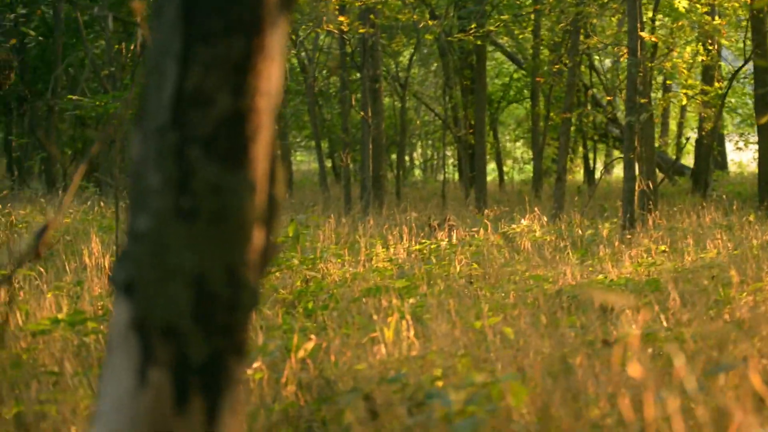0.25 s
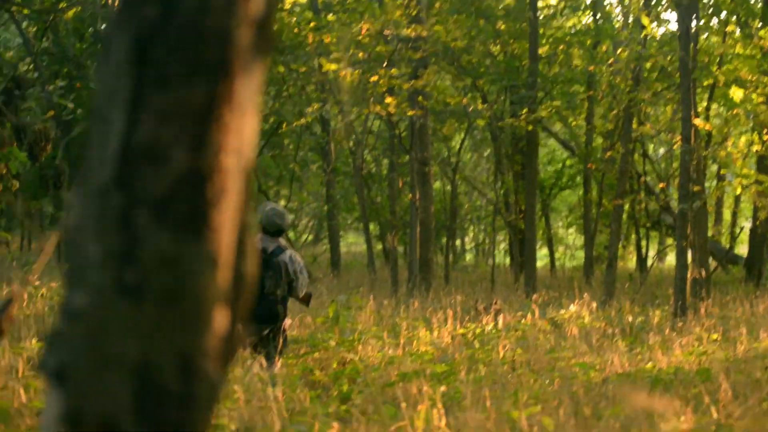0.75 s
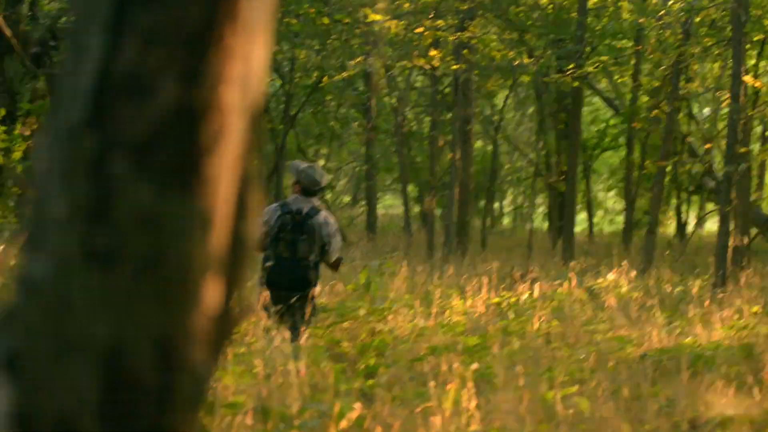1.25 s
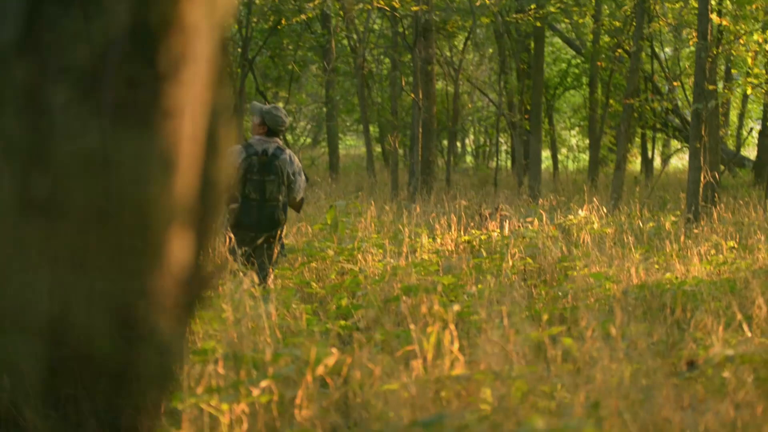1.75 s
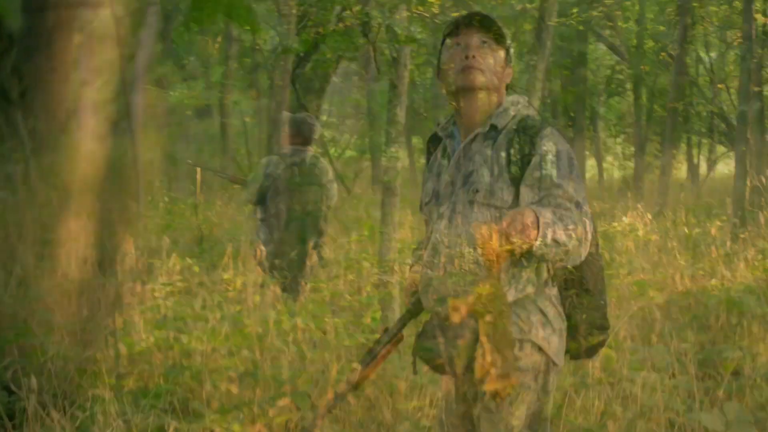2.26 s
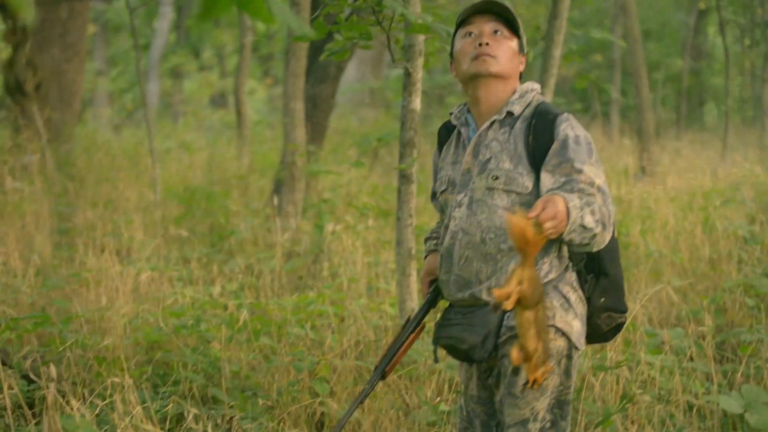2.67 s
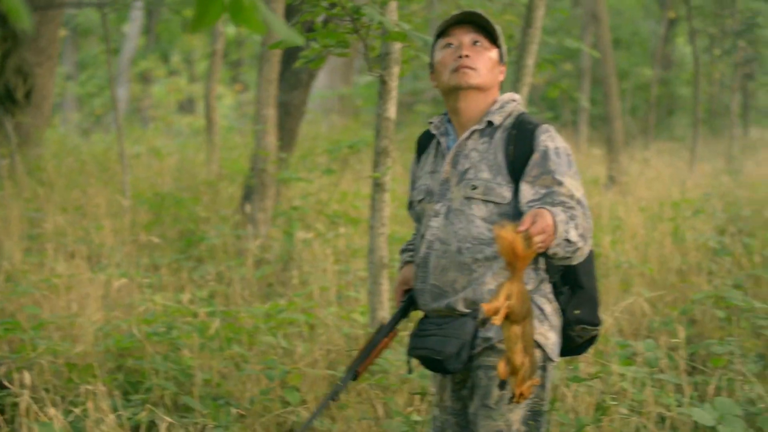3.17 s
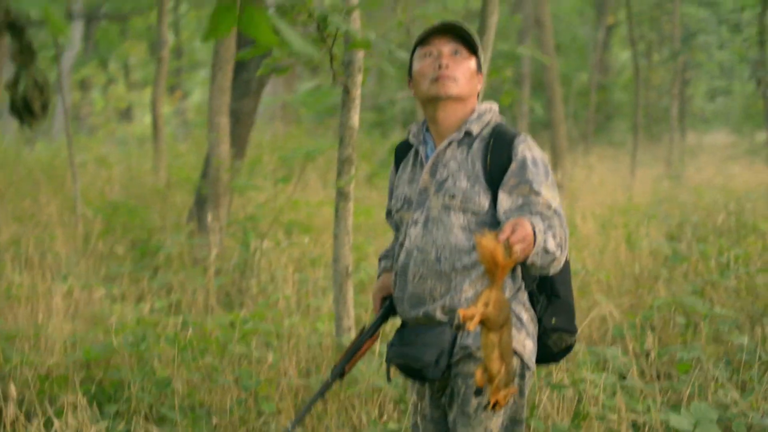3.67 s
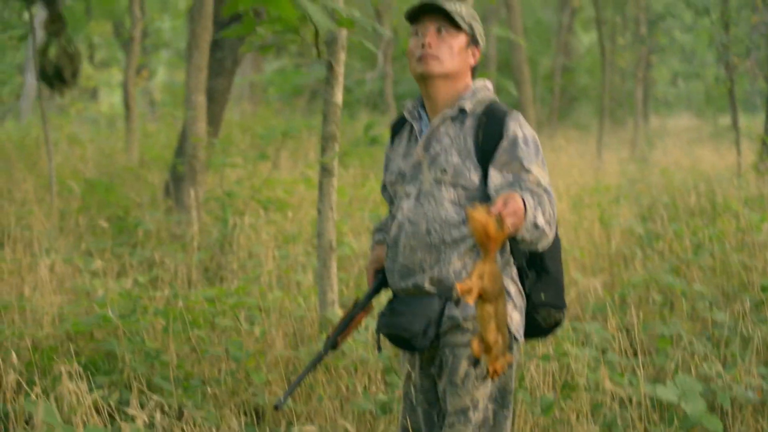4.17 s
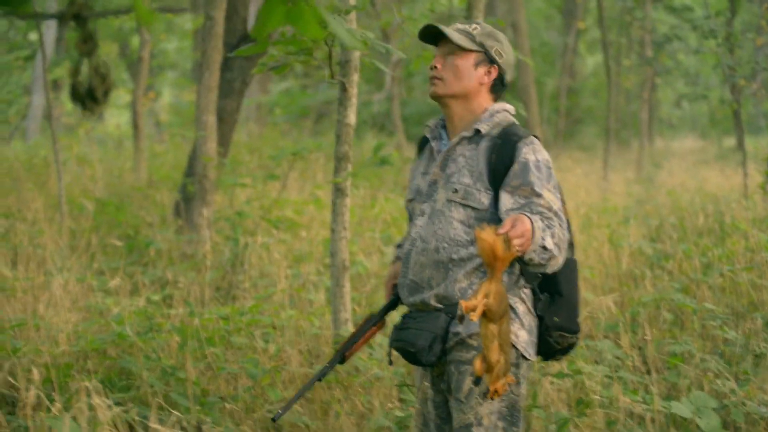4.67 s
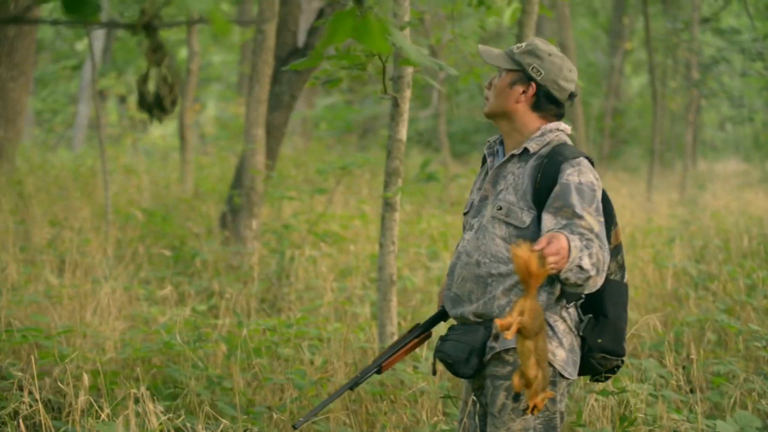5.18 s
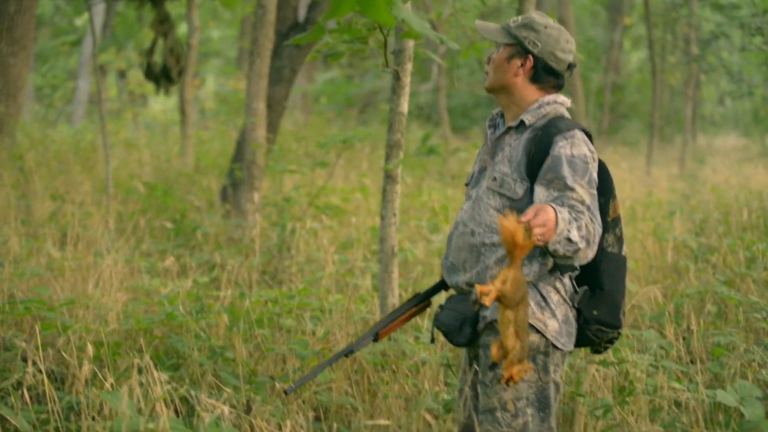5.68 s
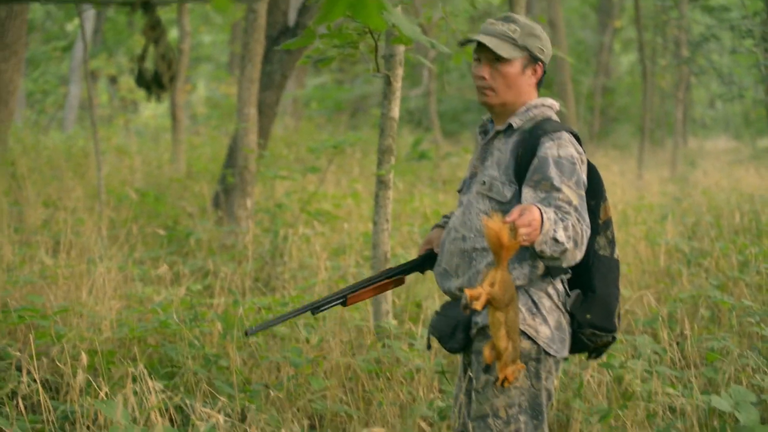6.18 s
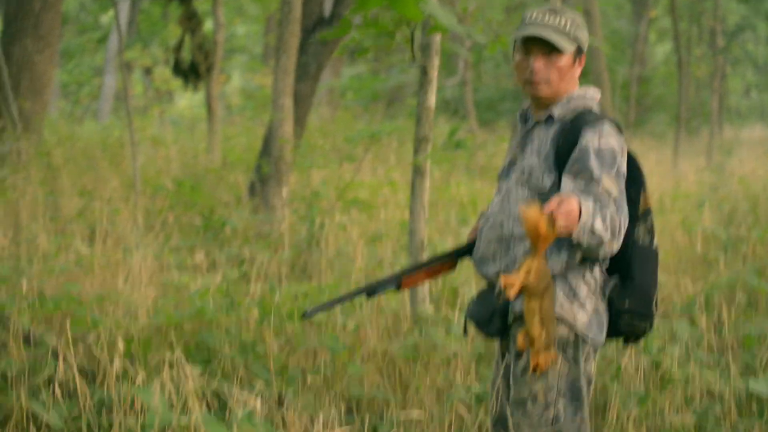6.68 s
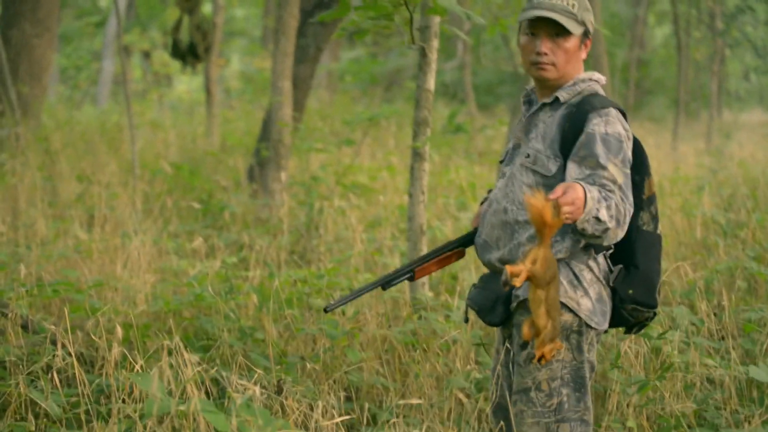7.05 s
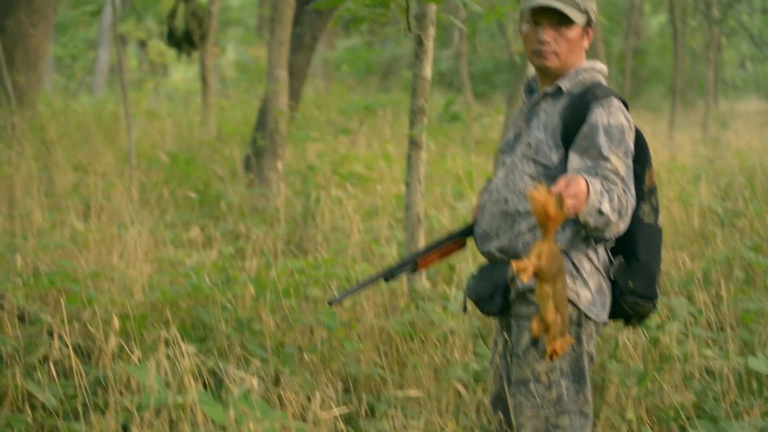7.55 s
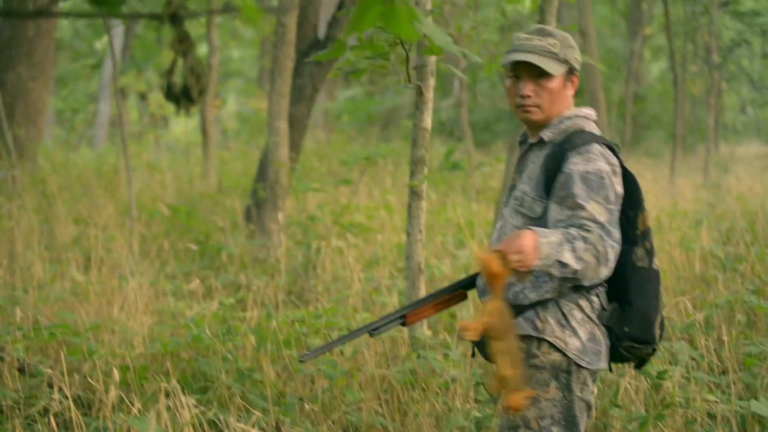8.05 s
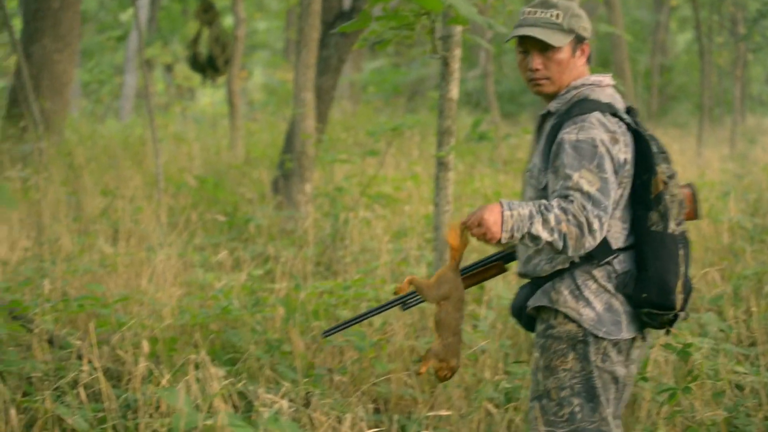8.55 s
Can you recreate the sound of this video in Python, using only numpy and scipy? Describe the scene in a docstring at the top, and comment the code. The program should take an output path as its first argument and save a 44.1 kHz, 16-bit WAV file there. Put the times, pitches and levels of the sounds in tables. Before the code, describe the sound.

Insects dominate a summer glade: steady high hiss, a rasping near cicada whose pitch slides down with each swell, and a fainter tonal one far off. First come close grass crunches and a hard woody snap; after an abrupt change of place and quick fade-in, movement thins to light ticks and soft cloth swishes. Late, a small bird whistles twice and chirps softly. Mono, open-air microphone.

```python
"""Cicadas in summer woodland

Heard from two spots in turn, the wood's edge and a glade, in mono. At each a near cicada buzzes and, about
every 0.8 s, squeezes out an accent: its clicks speed up while its abdomen's resonance slides down. Behind it:
a chorus and air of filtered noise, a far cicada and, in the glade, trills and a bird of gliding sines.
Ringing noise bursts and brushed noise are someone walking through dry grass; decaying modes are a twig's snap."""
import sys
import numpy as np
from scipy import signal
from scipy.fft import rfft, irfft, next_fast_len
from scipy.io import wavfile

SR = 44100
rng = np.random.default_rng(int(sys.argv[2]) if len(sys.argv) > 2 else 0)


def master_out(mix):
    """Clip the mix to full scale and print it as 16-bit PCM to the path in sys.argv[1]."""
    frames = np.transpose(np.atleast_2d(mix))
    ceiling = np.clip(frames, -1, 1)
    pcm = np.round(ceiling * 32767).astype(np.int16)
    wavfile.write(sys.argv[1], SR, pcm)


N = 388521
T = np.arange(N) / SR


def undb(db):
    """Decibels to gain."""
    return 10 ** (np.asarray(db) / 20)


def unit(x):
    """Scale to rms 1."""
    return x / np.sqrt(np.mean(x ** 2))


def curve(rows):
    """Join (t/s, value) rows by straight lines."""
    return np.interp(T, *np.transpose(rows))


def add(out, start_s, x):
    """Mix x into out from start_s on."""
    i = int(np.clip(start_s * SR, 0, N - 1))
    out[i:i + len(x)] += x[:N - i]


def colour(x, response):
    """Filter by (f/Hz, level/dB) points; beyond the ends the response falls 20 dB per octave."""
    size = next_fast_len(N + 4096)
    octave = np.log2(np.arange(size // 2 + 1) * SR / size + 1)
    hz, db = np.transpose(response)
    beyond = np.abs(octave - np.clip(octave, np.log2(hz[0]), np.log2(hz[-1])))
    gain = undb(np.interp(octave, np.log2(hz), db) - 20 * beyond)
    return irfft(rfft(x, size) * gain, size)[:N]


def walk(points_per_s):
    """Random points joined by lines, with a spread near 1."""
    return 1.2 * np.interp(T * points_per_s, np.arange(4096), rng.standard_normal(4096))


def woods(x, wet_db, t60_s, sway_hz=0.3535):
    """Direct sound plus the scatter from trunks and leaves, whose pattern shifts as they sway."""
    t = np.arange(SR // 2) / SR
    envelope = undb(-60 * t / t60_s) * np.clip(t / 0.0035, 0, 1)
    tails = rng.standard_normal((2, len(t))) * envelope
    one, other = (signal.oaconvolve(x, tail / np.linalg.norm(tail))[:N] for tail in tails)
    turn = 2 * np.pi * sway_hz * T
    wet = undb(wet_db)
    scatter = np.cos(turn) * one + np.sin(turn) * other
    return (x + wet * scatter) / np.hypot(1, wet)


# open-air spectrum, relative: f/Hz, level/dB (per Hz)
AIR_SPECTRUM = [(20, -12), (76, -5.5), (105, -4), (138, -1), (200, -6), (400, -11), (630, -14),
                (900, -12.5), (1200, -16.5), (1800, -21)]


def air(level_db):
    """A faint low murmur of the open air: filtered noise with a drifting level."""
    drift_db = 1.2 * walk(5)
    return unit(colour(rng.standard_normal(N), AIR_SPECTRUM)) * undb(level_db + drift_db)


# chorus spectrum at each spot, relative: f/Hz, level/dB (per Hz)
EDGE_CHORUS_SPECTRUM = [(1800, -34), (2600, -28), (3300, -10), (4200, -9.5), (5300, 1.5), (6100, -6.5),
                        (6900, -15), (7700, -18), (8900, -36), (12500, -36.5), (15500, -33)]
GLADE_CHORUS_SPECTRUM = [(1800, -39), (2600, -26), (3300, -10), (3700, -6.5), (4200, -6.5), (5300, 2.5),
                         (5750, -2.5), (6700, -9.5), (7800, -16), (8900, -29.5), (10500, -36), (13000, -41),
                         (15500, -36.5)]


def chorus(spectrum, level_db, count=5):
    """Many cicadas blurred by the trees into a hiss, which throbs at several wandering click rates."""
    throb = np.zeros(N)
    for _ in range(count):
        rate_hz = rng.uniform(230, 400) * (1 + .03 * walk(3))
        throb += np.cos(2 * np.pi * np.cumsum(rate_hz) / SR)
    hiss = rng.standard_normal(N) * (1 + 0.07 * throb)
    return unit(colour(hiss, spectrum)) * undb(level_db + 0.79 * walk(5.5))


# thin trills: f/Hz, flutter rate/(points per s), level/dB
TRILL_TONES = [(5830, 82, -38), (6380, 30, -58), (6690, 33, -61), (6770, 15, -51.5)]


def trills():
    """Distant insects that each hold one pitch, fluttering in strength and phase."""
    out = np.zeros(N)
    for hz, flutter, db in TRILL_TONES:
        wobble = walk(flutter) + 1j * walk(flutter)
        out += undb(db) * unit(np.real(wobble * np.exp(2j * np.pi * hz * T)))
    return out


def tymbals(rate_hz, ring_hz, rise_s, lag, scatter_db, jitter):
    """Two ribbed plates buckle in turn, each click ringing the hollow abdomen; returns ring and octave."""
    phase = np.cumsum(rate_hz * (1 + jitter * walk(300))) / SR
    phase = phase + lag * np.cos(np.pi * phase)  # second plate slightly out of step: half-rate lines
    age_s = (phase % 1) / rate_hz
    size = undb(scatter_db * rng.standard_normal(8192))[phase.astype(int) % 8192]
    turn = 2 * np.pi * ring_hz * age_s
    envelope = size * age_s / rise_s * np.exp(-age_s / rise_s)
    return unit(envelope * np.sin(turn)), unit(envelope * np.sin(2 * turn))


# far cicada's accents: t/s, level/dB
FAR_ACCENT_LEVELS = [(1.9, -38), (3.62, -36.5), (4.498, -36.5), (5.392, -34), (6.28, -32), (7.181, -32.5),
                     (8.07, -35), (8.4, -32)]
# click rate at the first accent, and its slow rise
FAR_CLICK_HZ, FAR_RISE_HZ_PER_S = 365.7, 1.3


def far_cicada(width_s=0.098):
    """Only the low, tonal end of each accent carries this far; the click rate sags through each."""
    s, db = np.transpose(FAR_ACCENT_LEVELS)
    since_s = T - s[:, None]
    loudness = undb(db) @ np.exp(-(since_s / width_s) ** 2)
    nearest_s = s[np.argmin(np.abs(since_s), axis=0)]
    sag = 1 - 0.055 * np.clip(T - nearest_s, -.2, .2)
    rate_hz = (FAR_CLICK_HZ + FAR_RISE_HZ_PER_S * (T - s[0])) * sag
    ring, _ = tymbals(rate_hz, 3400, 0.00031, lag=0.0059, scatter_db=2.0, jitter=0.00343)
    response = [(2000, -24), (2600, -9), (2950, 1), (3350, 0.5), (3700, 7.5), (4400, -9), (6000, -12)]
    return woods(unit(colour(ring, response)) * loudness, wet_db=-7.5, t60_s=0.25)


def note(length_s, from_hz, to_hz, arch_hz=0):
    """One pure gliding note that swells and fades, its pitch arching over the middle."""
    u = np.linspace(0, 1, int(length_s * SR))
    swell = np.sin(np.pi * u)
    pitch_hz = from_hz + (to_hz - from_hz) * u + arch_hz * swell
    return swell * np.sin(2 * np.pi * np.cumsum(pitch_hz) / SR)


# falling whistles: t/s, level/dB (peak, before scatter)
WHISTLE_STARTS = [(5.55, -60), (6.33, -54)]
WHISTLE_S, WHISTLE_FROM_HZ, WHISTLE_TO_HZ = .16, 2050, 1550
# even row of rising chirps, each fainter than the last
CHIRP_FIRST_S, CHIRP_EVERY_S, CHIRP_S = 6.858, .2245, 0.051
CHIRP_FROM_HZ, CHIRP_TO_HZ, CHIRP_ARCH_HZ = 1680, 1907, 90
CHIRP_DB, CHIRP_STEP_DB = -50.5, -0.36


def bird(count=7):
    """A small bird: two falling whistles, then a row of short rising chirps, all gliding sines."""
    out = np.zeros(N)
    for s, db in WHISTLE_STARTS:
        add(out, s, undb(db) * note(WHISTLE_S, WHISTLE_FROM_HZ, WHISTLE_TO_HZ))
    for k in range(count):
        chirp = note(CHIRP_S, CHIRP_FROM_HZ, CHIRP_TO_HZ, CHIRP_ARCH_HZ)
        add(out, CHIRP_FIRST_S + k * CHIRP_EVERY_S, undb(CHIRP_DB + k * CHIRP_STEP_DB) * chirp)
    return woods(out, wet_db=1.0, t60_s=0.37)


# clothing swishes: middle t/s, length/s, level/dB
CLOTH_SWISHES = [(1.35, 0.53, -59), (2.245, 0.47, -64.5), (3.9, 0.62, -63.5), (5.88, 0.66, -68),
                 (8.55, 0.6, -67.5)]


def clothing(rest_db=-75):
    """Cloth slides on cloth as the walker shifts: noise swells, over a faint floor from the second on."""
    s, length_s, db = np.transpose(CLOTH_SWISHES)
    swells = undb(db) @ np.exp(-(2 * (T - s[:, None]) / length_s[:, None]) ** 4)
    sliding = swells + undb(rest_db) * (T > s[1])
    response = [(150, -7), (280, -0.5), (450, 0.5), (650, -10.5), (1200, -10.0)]
    return unit(colour(rng.standard_normal(N), response)) * sliding


# twig's modes, relative: f/Hz, level/dB, t60/s
TWIG_MODES = [(227, -22, 0.027), (814, -8.5, 0.011), (1590, -9, 0.016), (1970, 10, 0.0035),
              (2360, 0, 0.004)]
SNAP_S, SNAP_DB = .5462, -5.5  # dB: knock peak before bass cut and scatter


def snap():
    """A twig breaks close by: decaying modes make a woody knock, a noise burst a bright splintering."""
    out, t = np.zeros(N), np.arange(SR // 4) / SR
    modes = sum(undb(db - 60 * t / t60_s) * np.sin(2 * np.pi * hz * t) for hz, db, t60_s in TWIG_MODES)
    knock = modes * (1 - np.exp(-t / 0.00068))
    splinters = rng.standard_normal(len(t)) * undb(-21.5 - 60 * t / 0.1)
    add(out, SNAP_S, splinters)
    out = colour(out, [(1000, 5.0), (3000, -2.5), (8300, 1.5), (9500, -11), (15000, -15)])
    add(out, SNAP_S, undb(SNAP_DB) * knock / np.abs(knock).max())
    return out


CRACK_CYCLES = 44  # fibre noise falls 60 dB in this many cycles of the pitch


def crack(hz):
    """A stalk gives way at once, then its last fibres tear; thick, low stalks take longer."""
    t = np.arange(SR // 8) / SR
    tearing = rng.standard_normal(len(t)) * undb(-60 * t * hz / CRACK_CYCLES)
    fibres = 14 * (t == 0) + tearing
    x = signal.lfilter(*signal.iirpeak(hz, 1.3, fs=SR), fibres)
    x = signal.lfilter(*signal.butter(2, min(1.37 * hz, SR / 3), fs=SR), x)
    return x / np.abs(x).max()


# loudest stalks, underfoot and against clothing: t/s, level/dB (peak, before bass cut and scatter), f/Hz
STALK_CRACKS = [(.439, -27, 2133), (.632, -33, 476), (.678, -23, 1410), (.684, -25.5, 839),
                (1.066, -21.5, 1264), (1.098, -31.5, 860), (1.278, -29, 566), (1.361, -30.5, 798),
                (1.509, -34, 1401), (2.695, -37.5, 1170), (2.783, -37, 1400), (2.864, -35.5, 1100),
                (3.13, -40, 668), (3.328, -36, 511), (3.329, -28.5, 1820), (3.53, -39, 980),
                (3.714, -39, 1172), (3.97, -32, 1250), (4.184, -39, 1220), (4.226, -39, 1350),
                (6.641, -38, 2380), (7.149, -42.5, 640), (7.454, -49, 280)]
# brushed-grass response: f/Hz, level/dB
GRASS_RESPONSE = [(100, -23), (250, -7), (420, 0.5), (800, -4), (1300, -1), (2200, -6.5), (5000, -17.5),
                  (15000, -30)]
# brushing at each spot, before footfalls' trims and the glade's fade: t/s, level/dB
EDGE_BRUSH_LEVEL = [(0.0, -57.5), (0.5, -59.5), (0.698, -52.5), (0.97, -56), (1.186, -51.5), (1.498, -59.5),
                    (1.62, -56)]
GLADE_BRUSH_LEVEL = [(2.1, -73), (2.23, -64), (3.37, -55), (4.34, -68.5), (6.02, -67), (6.26, -70),
                     (7.66, -67.5), (8.2, -69)]
# random lesser stalks: density, greatest level over the brushing, pitch range
SMALL_CRACKS_PER_S, SMALL_CRACK_DB, SMALL_LOW_HZ, SMALL_HIGH_HZ = 9, 14.5, 450, 2100


def footfalls(edge_trim_db=4, glade_trim_db=1, count=160):
    """Stalks crack over a crackle of brushed grass; harder brushing, louder small cracks; a twig snaps."""
    edge_brush = undb(curve(EDGE_BRUSH_LEVEL) + edge_trim_db)
    glade_brush = undb(curve(GLADE_BRUSH_LEVEL) + curve(GLADE_FADE_LEVEL) + glade_trim_db)
    brush = np.where(T < MOVE_S, edge_brush, glade_brush)
    blade_size = undb(2.3 * np.minimum(rng.exponential(size=N), 6))
    blades = rng.standard_normal(N) * (rng.random(N) < .08) * blade_size  # sparse impulses
    out = snap()
    for s, db, hz in STALK_CRACKS:
        add(out, s, undb(db) * crack(hz))
    for k, (when, pitch, size) in enumerate(rng.random((count, 3))):
        s = (k + 2 * when) / SMALL_CRACKS_PER_S
        gain = np.interp(s, T, brush, right=0) * undb(SMALL_CRACK_DB + 17 * (size - 1.0))
        hz = SMALL_LOW_HZ * (SMALL_HIGH_HZ / SMALL_LOW_HZ) ** pitch
        add(out, s, gain * crack(hz))
    out = signal.lfilter(*signal.butter(2, 130, "high", fs=SR), out)  # thin stalks radiate no bass
    return woods(out, wet_db=-13.5, t60_s=0.3) + unit(colour(blades, GRASS_RESPONSE)) * brush


# effort builds up to an accent, holds, lets go
BUILD_S, HOLD_S, LET_GO_S = .07, .112, .022
# stretch starts before the accent, creeps back after the hold
STRETCH_LEAD_S, RECOVER_S = 0.04004, 0.05505


def squeeze(accent_s):
    """Effort and stretch of the abdomen, both 0-1, around each accent."""
    since_s = T - accent_s[:, None]
    after_s = np.maximum(since_s - HOLD_S, 0)
    effort = np.exp(np.minimum(since_s, 0) / BUILD_S - after_s / LET_GO_S)
    pull = np.clip((since_s + STRETCH_LEAD_S) / (HOLD_S + STRETCH_LEAD_S), 0, 1) ** .85
    stretch = pull * np.exp(-after_s / RECOVER_S)
    return effort.max(axis=0), stretch.max(axis=0)


# accents at each spot: t/s, buzz level/dB (glade: before its fade), swell strength/1
EDGE_ACCENT_ROWS = [(.118, -28.5, 0.81), (.838, -27.5, 0.58), (1.54, -28, 0.38)]
GLADE_ACCENT_ROWS = [(1.7, -31, .81), (2.535, -29.5, 1), (3.364, -27, 1), (4.16, -25, 0.88),
                     (4.943, -24.5, 1), (5.735, -23, 0.85), (6.495, -24, 0.92), (7.25, -23.2, 0.74),
                     (7.993, -22, 0.74), (8.735, -22.5, 0.89)]
# response of each near cicada's body: f/Hz, level/dB
EDGE_BODY_RESPONSE = [(1500, -53), (2500, -14), (3000, -5), (3400, 2), (3900, -6.5), (4500, -3),
                      (5200, 2.5), (6200, 0.5), (6900, -9), (7700, 1.5), (8300, -2.5), (9200, -29)]
GLADE_BODY_RESPONSE = [(1500, -43), (2500, -23.5), (3200, -1), (3650, 0.5), (4300, -0.5), (5300, 0.5),
                       (5750, 2.5), (6200, 1), (6700, 1), (7300, -2.5), (8300, -5), (9200, -23)]
# abdomen's resonance at rest and fully stretched, before each cicada's tuning factor
REST_HZ, STRETCHED_HZ = 5810, 4106
REST_RATE_SHARE = .66  # resting click rate / full-effort rate
# effort swells the buzz; stretch damps it, and chokes the overtone while effort lasts
EFFORT_DB, STRETCH_DB, OVERTONE_STRETCH_DB = 8, -7.5, -35.5
# full-effort click rate at the first accent, before the stretch's slight slowing; its slow rise
EDGE_CLICK_HZ, GLADE_CLICK_HZ, CLICK_RISE_HZ_PER_S = 419, 394.6, 2.1


def near_cicada(accents, click_hz, body, tuning, rise_s, unsteady, overtone_db, wet_db, t60_s):
    """Effort speeds the clicks and swells the buzz; stretch lowers the resonance and damps its overtone."""
    s, db, swell = np.transpose(accents)
    effort, stretch = squeeze(s)
    share = REST_RATE_SHARE + (1 - REST_RATE_SHARE) * effort
    full_rate_hz = click_hz + CLICK_RISE_HZ_PER_S * (T - s[0])
    rate_hz = share * full_rate_hz * (1 - .012 * stretch ** 4)
    ring_hz = tuning * (REST_HZ + (STRETCHED_HZ - REST_HZ) * stretch)
    jitter = unsteady + .042 * np.maximum(1 - share, 0)  # slack clicks rasp; at full speed they lock into a tone
    ring, octave = tymbals(rate_hz, ring_hz, rise_s, lag=0.0097, scatter_db=1.66, jitter=jitter)
    response = [(8000, -5), (9300, 7.0), (10500, 2.5), (11700, -4), (12300, -1), (13200, -10)]
    overtone = unit(colour(octave, response))
    choked_db = overtone_db + OVERTONE_STRETCH_DB * stretch * np.sqrt(effort)
    buzz = unit(colour(ring, body)) + undb(choked_db) * overtone
    accent_db = np.interp(T, s, swell) * (EFFORT_DB * effort + STRETCH_DB * stretch ** 2)
    level_db = np.interp(T, s, db) + accent_db + 0.5 * walk(25)
    return woods(buzz * undb(level_db), wet_db, t60_s)


MOVE_S = 1.662  # edge cuts to glade
# glade's fade-in: t/s, level/dB
GLADE_FADE_LEVEL = [(1.66, -13), (1.78, -15), (1.9, -8), (2.03, -3.5)]
# glade's air murmur, before scene's trim and the fade: t/s, level/dB
GLADE_AIR_LEVEL = [(2.1, -65.5), (2.8, -61.5), (3.42, -64), (8.7, -68.5)]


def scene():
    """The wood's edge cuts off and the glade fades in; the walker is heard at both."""
    edge = air(level_db=-61.5) + chorus(EDGE_CHORUS_SPECTRUM, level_db=-29)
    edge = edge + near_cicada(EDGE_ACCENT_ROWS, EDGE_CLICK_HZ, EDGE_BODY_RESPONSE, tuning=0.91, rise_s=0.00017,
                              unsteady=.002, overtone_db=-26, wet_db=8.5, t60_s=0.26)
    glade = air(level_db=curve(GLADE_AIR_LEVEL) + 7.5)
    glade = glade + chorus(GLADE_CHORUS_SPECTRUM, level_db=curve([(2, -27), (5, -26), (8.8, -24.5)]))
    glade = glade + trills() + far_cicada() + bird()
    glade = glade + near_cicada(GLADE_ACCENT_ROWS, GLADE_CLICK_HZ, GLADE_BODY_RESPONSE, tuning=0.99,
                                rise_s=0.00018, unsteady=0.00349, overtone_db=-29.0, wet_db=1, t60_s=0.21)
    spots = np.where(T < MOVE_S, edge, glade * undb(curve(GLADE_FADE_LEVEL)))
    mono = spots + clothing() + footfalls()
    return np.array([mono, mono])


TOP_HZ = 15750


def record(dry):
    """A steep cut of the top: tenth-order elliptic low-pass."""
    return signal.sosfilt(signal.ellip(10, .2, 80, TOP_HZ, fs=SR, output="sos"), dry)


dry = scene()
out = record(dry)
master_out(out)
```